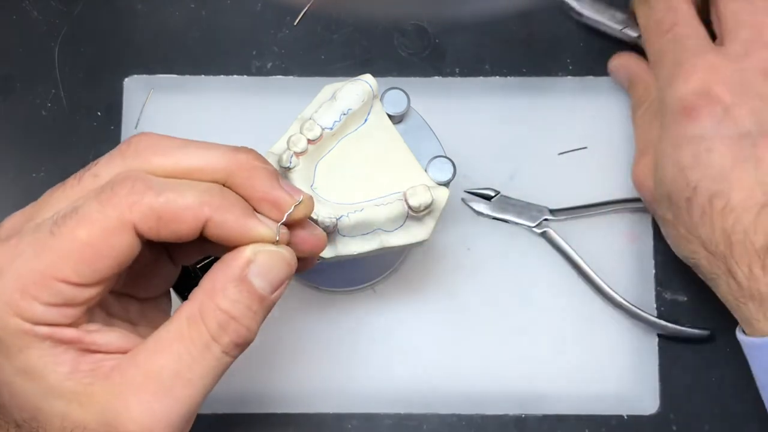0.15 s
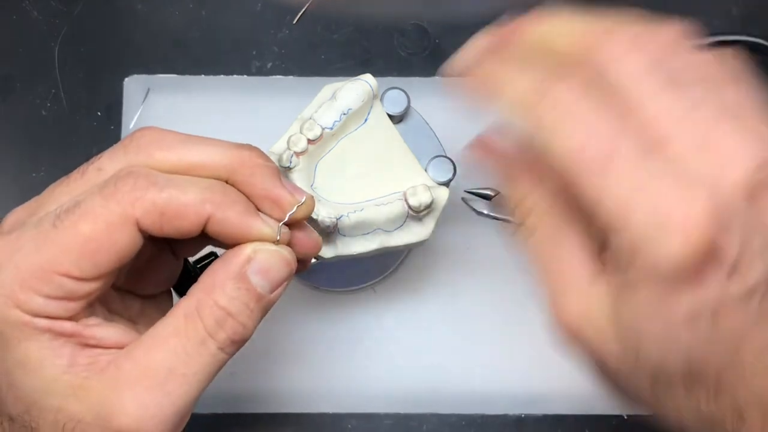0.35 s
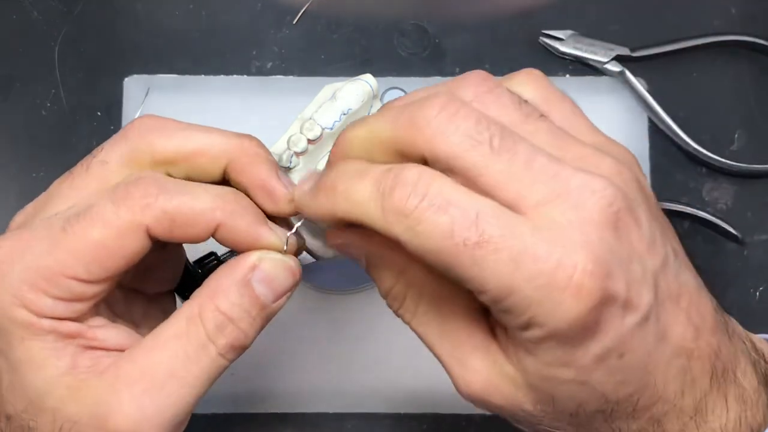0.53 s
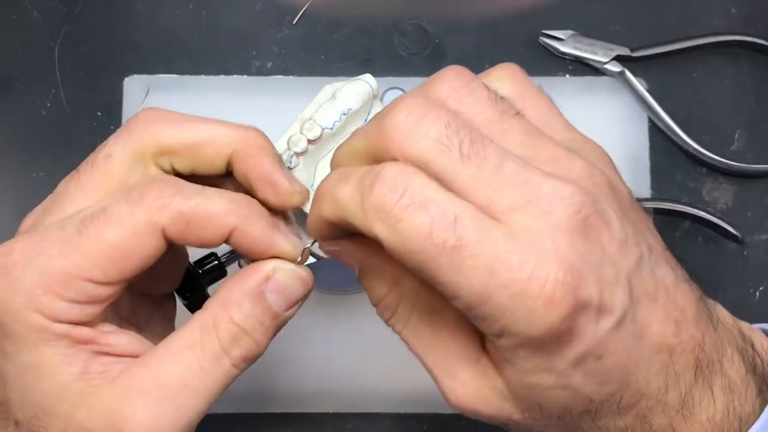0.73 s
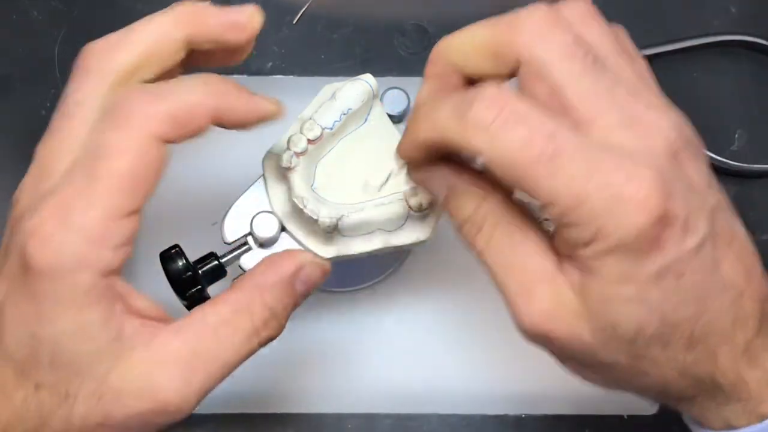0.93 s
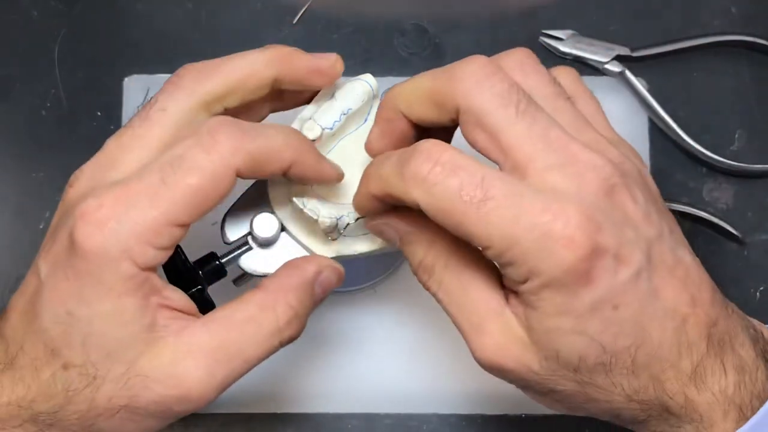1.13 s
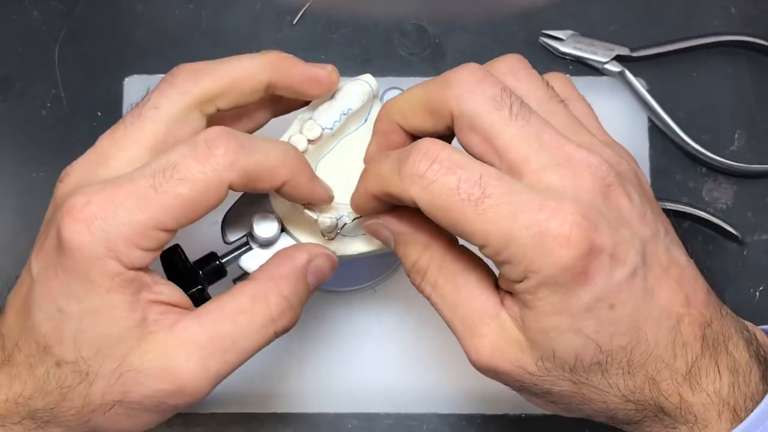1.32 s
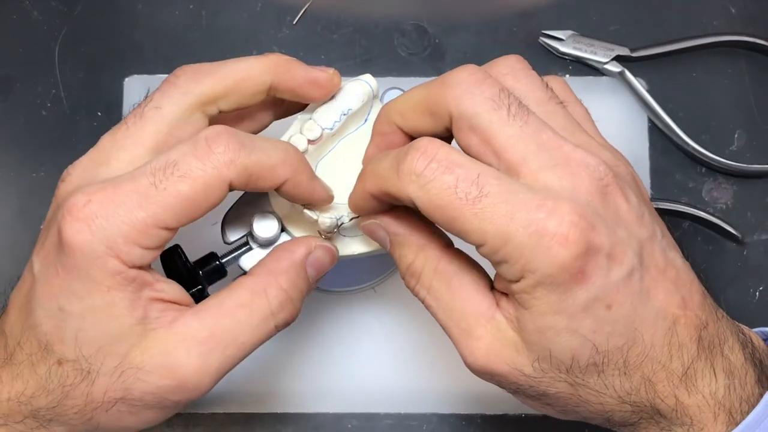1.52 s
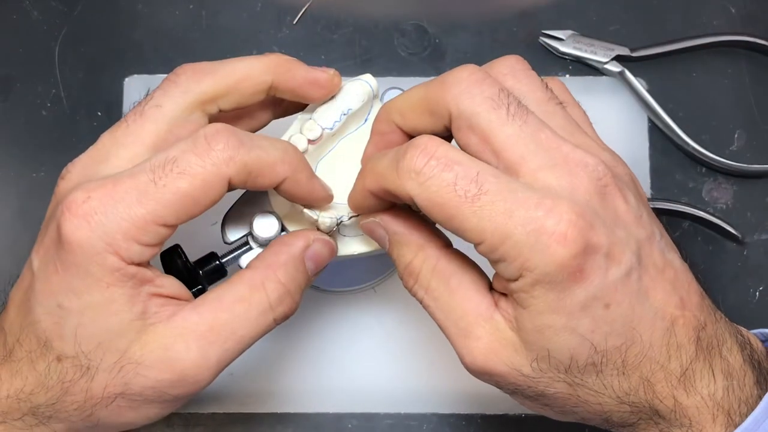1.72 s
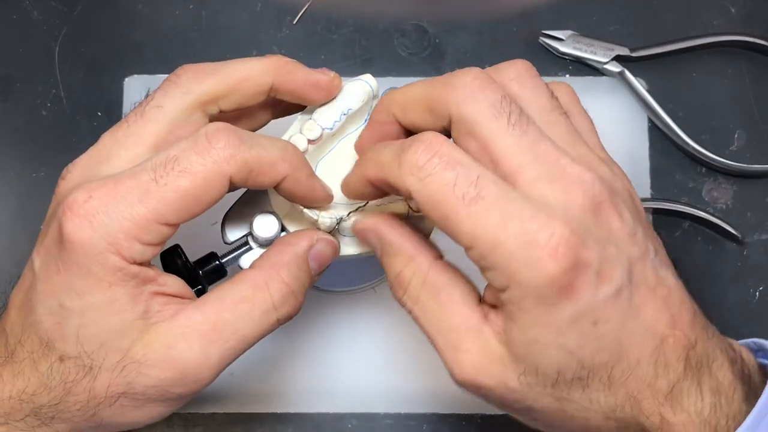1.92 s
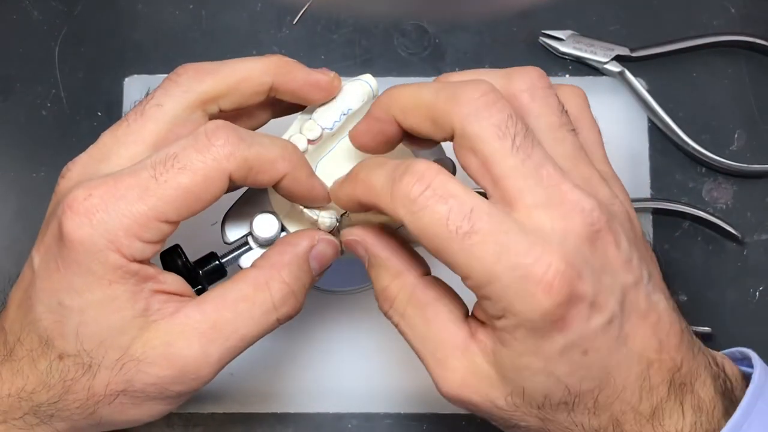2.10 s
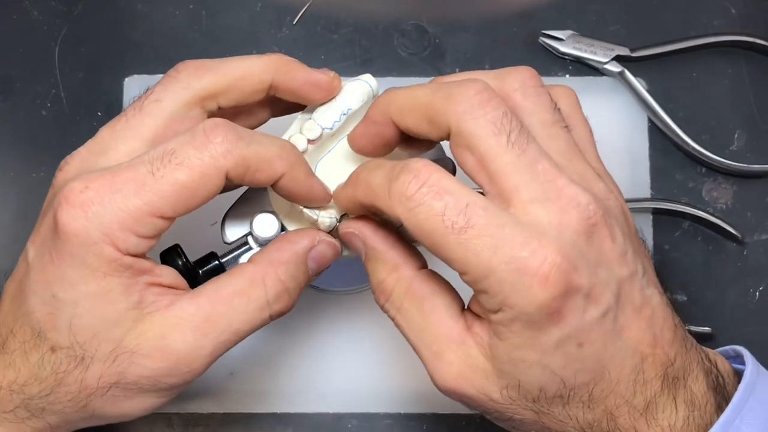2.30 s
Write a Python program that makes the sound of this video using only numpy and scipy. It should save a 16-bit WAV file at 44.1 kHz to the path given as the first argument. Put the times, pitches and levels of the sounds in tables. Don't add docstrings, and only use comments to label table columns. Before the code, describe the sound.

A metal hand tool is set down with a hard clanking knock, followed by tiny ticks and rubs.

```python
import sys
import numpy as np
from scipy import signal
from scipy.fft import rfft, irfft
from scipy.io import wavfile
from scipy.ndimage import uniform_filter1d

SR = 44100
rng = np.random.default_rng(int(sys.argv[2]) if len(sys.argv) > 2 else 0)


def put_to_file(sound):
    columns = np.atleast_2d(sound).T
    safe = np.clip(columns, -1, 1)
    whole_steps = np.round(safe * 32767)
    wavfile.write(sys.argv[1], SR, whole_steps.astype(np.int16))


def invert_db(x):
    u = np.asarray(x, float) / 20
    return 10 ** u


N = 103635

# (time [s], thump level [dB], knock level [dB], crack level [dB],
# mode struck hardest [Hz])
BENCH_LANDINGS = [(0.1006, -35.5, -41, -63.5, 900), (.1060, -38.5, -44, -65, 280),
                  (0.239, -24.5, -8, -11, 1300), (0.2426, -9, -14, -11, 280), (.2470, -11.5, -14, -20, 560),
                  (.2530, -10.5, -15.5, -41.5, 560), (0.2599, -16, -3, -6, 3200),
                  (.2635, -12.5, -6, -12.5, 1228), (0.2767, -16, -17, -40, 680),
                  (0.3006, -20, -24, -18, 2450), (0.3043, -20, -16.5, -30.5, 315),
                  (0.316, -24, -21, -30.5, 870)]
THUMP_BELOW_HZ = 450


def rms_one(x):
    return x / np.sqrt(np.mean(x ** 2) + 1e-20)


def at_hz(points, hz):
    table_hz, values = np.array(points)[:, 0], np.array(points)[:, 1]
    return np.interp(np.log(hz + 1), np.log(table_hz), values)


def coloured(x, points, bumps=()):
    hz = np.arange(len(x) // 2 + 1) * SR / len(x)
    db = at_hz(points, hz)
    for centre_hz, width_hz, gain_db in bumps:
        db = db + gain_db * np.exp(-((hz - centre_hz) / width_hz) ** 2)
    return irfft(rfft(x) * invert_db(db), len(x))


def filtered(x, design):
    return signal.sosfilt(design, x)


def band(low_hz, high_hz):
    design = signal.butter(2, [low_hz, high_hz], "band", fs=SR, output="sos")
    return filtered(rng.standard_normal(N), design)


def since(s):
    t = np.arange(N) / SR - s
    return np.maximum(t, 0), t >= 0


def ring(clicks, hz, t60):
    r, w = invert_db(-60 / (t60 * SR)), 2 * np.pi * hz / SR
    return signal.lfilter([0, np.sin(w)], [1, -2 * r * np.cos(w), r * r], clicks + 1e-18)


def crack(s, db, t60, noise):
    t, on = since(s)
    return on * invert_db(db - 60 * t / t60) * noise


def struck(hits, modes, off_db_per_oct, noise, crack_t60):
    contact_s = 0.00034
    t = np.arange(200) / SR
    grit = rng.standard_normal((len(hits), len(modes), 200)) * np.exp(-t / contact_s)
    out = np.zeros(N)
    for k, (hz, mode_db, t60) in enumerate(modes):
        force = np.zeros(N)
        for (s, db, struck_hz, _), contact in zip(hits, grit):
            i = int(s * SR)
            gain = invert_db(db + mode_db - off_db_per_oct * abs(np.log2(hz / struck_hz)))
            strength = abs(np.sum(contact[k] * np.exp(2j * np.pi * hz * t)))
            force[i:i + 200] += gain * contact[k] / strength
        out += ring(force, hz, t60)
    return out + sum(crack(s, db, crack_t60, noise) for s, _, _, db in hits)


def air():
    # (frequency [Hz], density [dB per Hz])
    rumble_colour = [(12, -46.5), (20, -20), (48, -2), (81, -4.5), (107, -2), (121, -4), (146, -15.5),
                     (199, -25), (260, -31), (340, -51.5), (570, -120)]
    # (frequency [Hz], width [Hz], gain [dB])
    room_modes = [(49.7, 2.7, -2.5), (69, 18, 1), (75, 2.5, -20.5), (101.3, 17, 3)]
    # (frequency [Hz], density [dB per Hz])
    hiss_colour = [(120, -49.5), (200, -2.5), (366, -10), (464, -16), (2080, -24.5), (4900, -38),
                   (6110, -34.5), (10400, -41.5), (15800, -33)]
    # (frequency [Hz], width [Hz], gain [dB])
    duct_bumps = [(2136, 47, 7), (3973, 206, 9.5), (4650, 100, 1), (6090, 300, 9), (7555, 74, 17),
                  (7850, 100, 7), (8440, 220, 8), (11230, 780, 0), (11400, 510, 6), (15250, 300, 4.5)]
    rumble_db, hiss_db, whine_db = -34.5, -54, -74
    hiss_top_hz, whine_hz = 15780, 1075

    rumble = coloured(rng.standard_normal(N), rumble_colour, room_modes)
    hiss = coloured(rng.standard_normal(N), hiss_colour, duct_bumps)
    hiss = filtered(hiss, signal.cheby2(14, 45, hiss_top_hz * 1.01, fs=SR, output="sos"))
    whine = invert_db(whine_db) * np.sin(2 * np.pi * whine_hz * since(0)[0])
    return invert_db(rumble_db) * rms_one(rumble) + invert_db(hiss_db) * rms_one(hiss) + whine


def clinks():
    # (time [s], level [dB], mode struck hardest [Hz], crack level [dB])
    handle_clinks = [
        (.0365, -24, 10800, -31.5),
        (.0385, -27.5, 4460, -59),
        (.0415, -40, 9600, -56),
        (.0525, -34.5, 5900, -48),
        (.0605, -55, 5800, -53),
        (.2400, -25, 13300, -16),
        (.2597, -11, 13300, -30),
        (.2725, -28, 14400, -58),
        (0.301, -42, 13300, -43),
    ]
    # (frequency [Hz], level [dB], t60 [s])
    steel_modes = [(2865, -24.5, .02), (4460, -6, .017), (5790, -2.5, .013), (6280, 5.5, 0.0072),
                   (7230, -13.5, 0.018), (9360, -9, .045), (10800, -9, 0.0096), (13300, -10, .012),
                   (14400, -9.5, .015), (14800, -10, .06)]
    return struck(handle_clinks, steel_modes, off_db_per_oct=19, noise=band(3600, 15300), crack_t60=0.008)


def landings():
    # (frequency [Hz], level [dB], t60 [s])
    bench_modes = [(182, -8, .07), (279, 1, 0.076), (315, -3, 0.13), (371, -6.5, .05), (575.5, -6, 0.055),
                   (680, -8, .04), (870, -4, 0.044), (1000, -6.5, .04), (1228, -3.5, 0.03),
                   (1590, -6.5, 0.055), (1900, -15.5, 0.047), (2450, -22, 0.066), (3200, -8.5, 0.014),
                   (3840, -12, 0.026)]
    touches_per_s, rattle_s, rattle_share = 1500, 0.0032, 0.49
    spread_db, off_db_per_oct = 3.5, 3

    touches = (rng.random(N) < touches_per_s / SR) * rng.standard_normal(N)
    rattle_decay = np.exp(-np.arange(600) / SR / rattle_s)
    luck = rng.standard_normal((len(BENCH_LANDINGS), len(bench_modes)))
    out = np.zeros(N)
    for k, (hz, mode_db, t60) in enumerate(bench_modes):
        force = np.zeros(N)
        is_thump = hz < THUMP_BELOW_HZ
        for (s, thump_db, knock_db, _, struck_hz), chance in zip(BENCH_LANDINGS, luck):
            i = int(s * SR)
            hit_db = thump_db if is_thump else knock_db
            off_db = off_db_per_oct * abs(np.log2(hz / struck_hz))
            gain = invert_db(hit_db + mode_db + spread_db * chance[k] - off_db)
            if is_thump:
                force[i] += gain
            else:
                force[i:i + 600] += rattle_share * gain * touches[i:i + 600] * rattle_decay
                force[i] += gain * np.sign(chance[k - 1])
        out += ring(force, hz, t60)
    return filtered(out, signal.butter(4, 99, "high", fs=SR, output="sos"))


def cracks():
    # (frequency [Hz], density [dB per Hz])
    crack_colour = [(300, -25.5), (700, -13.5), (1400, -15.5), (2200, -19.5), (4050, -13), (4900, -19.5),
                    (13200, -26.5), (16500, -27.5)]
    noise = rms_one(coloured(rng.standard_normal(N), crack_colour))
    return sum(crack(s, db, 0.025, noise) for s, _, _, db, _ in BENCH_LANDINGS)


def fingers():
    # (time [s], level [dB], mode struck hardest [Hz], crack level [dB])
    wire_ticks = [
        (.8030, -49.5, 14200, -53),
        (1.190, -57, 2600, -67),
        (1.6956, -58, 1200, -54),
        (1.6980, -39.5, 1500, -47.5),
        (1.700, -43.5, 3050, -52),
        (1.7132, -44.5, 1750, -42),
    ]
    # (frequency [Hz], level [dB], t60 [s])
    cast_modes = [(750, 1.5, 0.023), (1200, -2.5, 0.013), (1500, 4.5, 0.02), (1750, 1.5, .025),
                  (2200, 1, 0.018), (2600, -5, 0.016), (3050, -3.5, 0.018), (4570, -3, 0.011),
                  (5670, -2, .01), (14200, 2, 0.013)]
    # (time [s], length [s], level [dB], centre [Hz], width [Hz])
    finger_rubs = [
        (0.77, 0.18, -69, 6860, 3000),
        (1.28, 0.064, -77, 2200, 1500),
        (1.708, 0.34, -63, 1740, 131),
        (1.72, 0.067, -70, 3370, 500),
        (1.847, 0.62, -64, 800, 500),
    ]
    out = struck(wire_ticks, cast_modes, off_db_per_oct=10.5, noise=band(700, 6800), crack_t60=0.023)
    for s, length, db, hz, width in finger_rubs:
        progress = np.minimum(since(s)[0] / length, 1)
        swell = np.sin(np.pi * progress).clip(0) ** .5
        out += invert_db(db) * swell * rms_one(band(hz - width / 2, hz + width / 2))
    return out


def room(x):
    # (frequency [Hz], t60 [s], level [dB])
    echo_bands = [(100, 0.65, -6), (300, 0.56, -1.5), (800, 0.57, 6.5), (1500, .55, 2), (3000, 0.32, -4),
                  (6000, 0.3, -3.5), (15000, 0.12, 2.5)]
    echo_db, build_up_s = -14.5, 0.0022
    t = np.arange(SR * 2 // 3) / SR
    echo = np.zeros(len(t))
    for hz in 100 * 2.0 ** np.arange(0, 7.5, .5):
        design = signal.butter(2, [hz / 1.19, hz * 1.19], "band", fs=SR, output="sos")
        part = filtered(rng.standard_normal(len(t)), design)
        level_db = at_hz(np.array(echo_bands)[:, ::2], hz)
        echo += part * invert_db(level_db - 60 * t / at_hz(echo_bands, hz))
    echo = echo * (1 - np.exp(-t / build_up_s))
    echo = echo / np.sqrt(np.sum(echo ** 2))
    return invert_db(echo_db) * signal.fftconvolve(x, echo)[:N]


def scene():
    bench = landings()
    sharp = cracks() + clinks() + fingers()
    thump = filtered(bench, signal.butter(2, THUMP_BELOW_HZ, fs=SR, output="sos"))
    echo = room(0.42 * thump + sharp)
    return (bench + sharp + echo + air())[None]


def band_limit(x):
    return signal.sosfilt(signal.butter(12, 16740, fs=SR, output="sos"), x)


def record(dry):
    duck_above_db, duck_ratio, recover_db_per_s = -10, 0.25, 12
    peak_top, cutoff_hz = 1.1, 16750
    level_db = 10 * np.log10(uniform_filter1d(dry[0] ** 2, size=200) + 1e-12)
    over = duck_ratio * np.maximum(level_db - duck_above_db, 0)
    slope = recover_db_per_s * np.arange(N) / SR
    held = np.maximum.accumulate(over + slope) - slope
    duck_db = signal.lfilter([.005], [1, -.995], held)
    x = peak_top * np.tanh(dry * invert_db(-duck_db) / peak_top)
    x = filtered(x, signal.cheby2(12, 45, cutoff_hz, fs=SR, output="sos"))
    x = x * np.minimum(np.arange(N, 0, -1) / 200, 1)
    return band_limit(x)


dry = scene()
out = record(dry)
put_to_file(out)
```